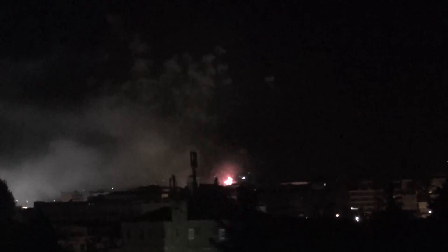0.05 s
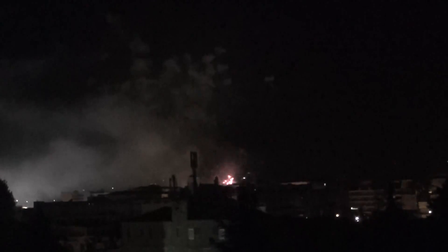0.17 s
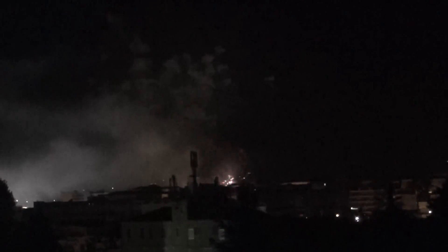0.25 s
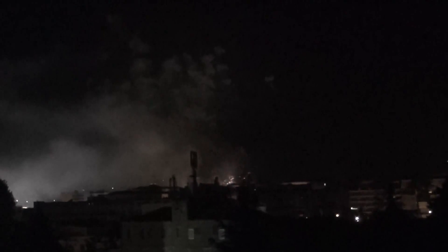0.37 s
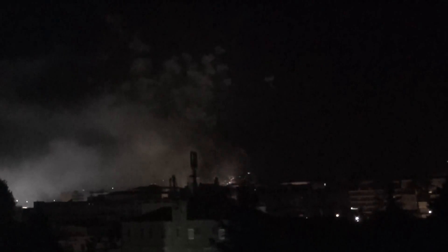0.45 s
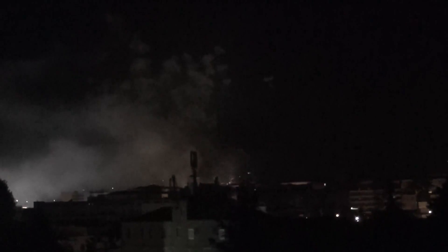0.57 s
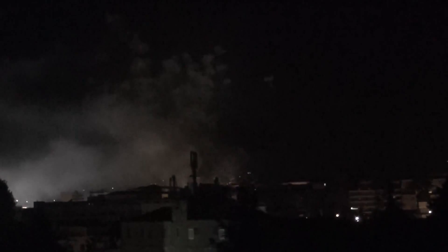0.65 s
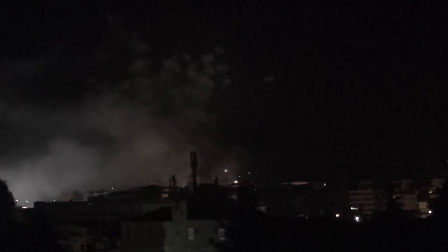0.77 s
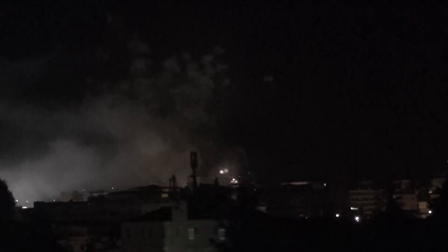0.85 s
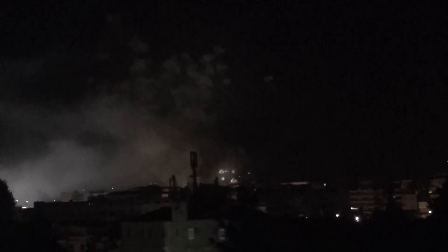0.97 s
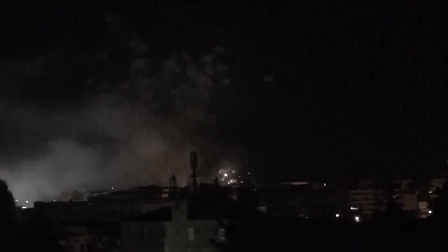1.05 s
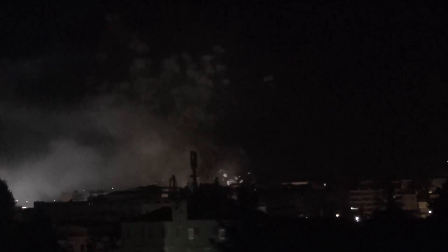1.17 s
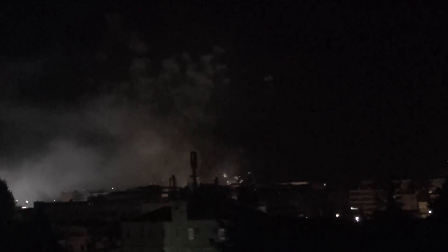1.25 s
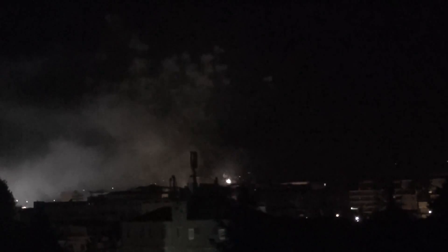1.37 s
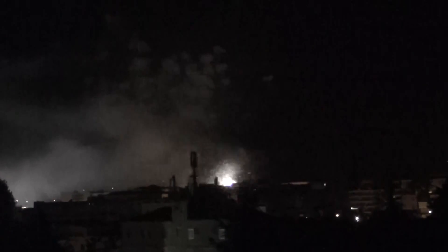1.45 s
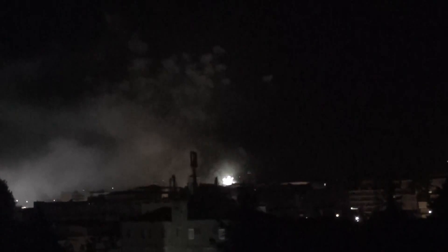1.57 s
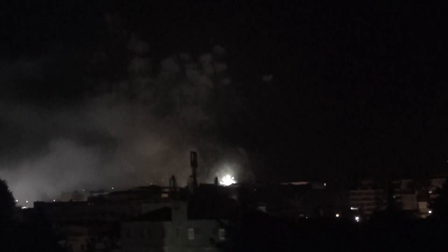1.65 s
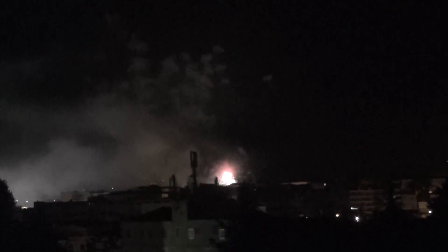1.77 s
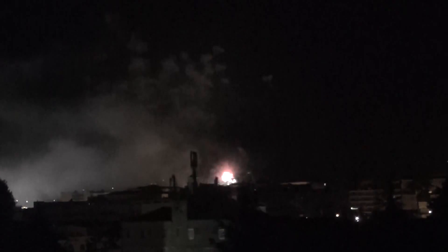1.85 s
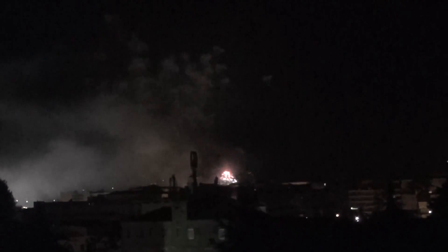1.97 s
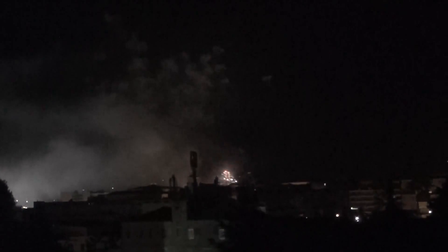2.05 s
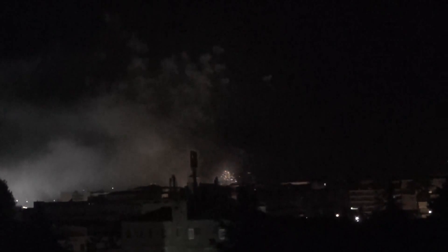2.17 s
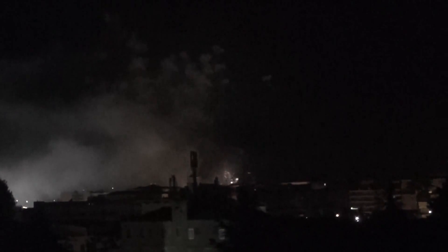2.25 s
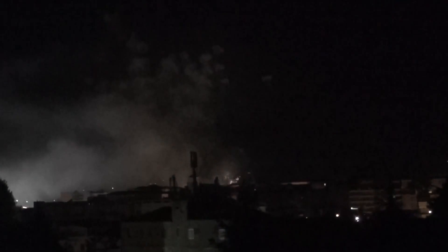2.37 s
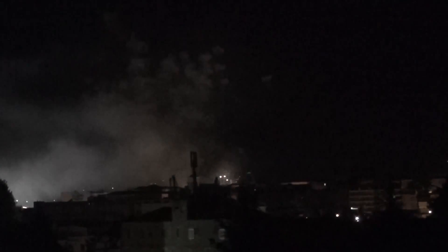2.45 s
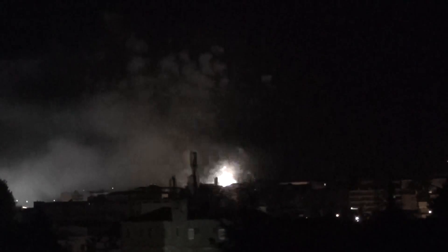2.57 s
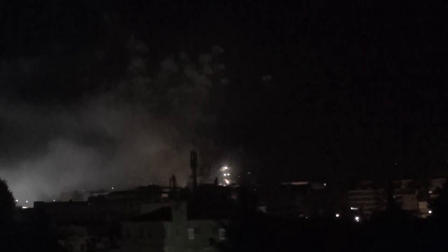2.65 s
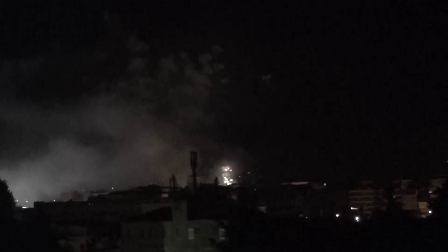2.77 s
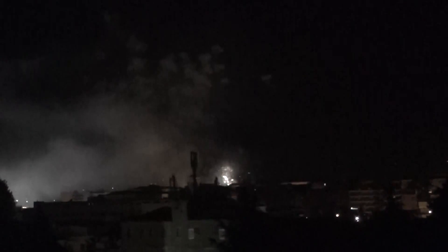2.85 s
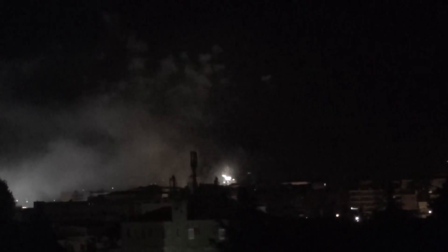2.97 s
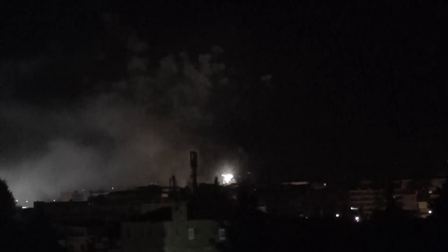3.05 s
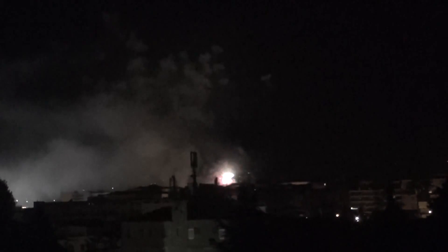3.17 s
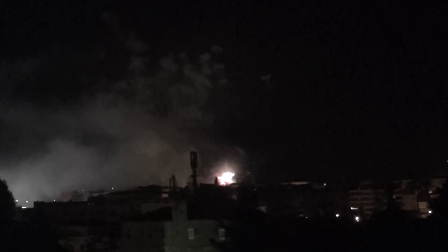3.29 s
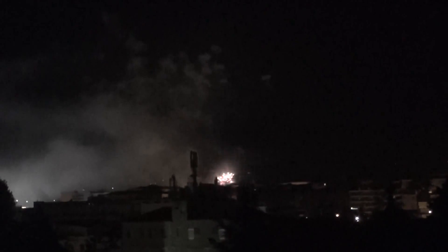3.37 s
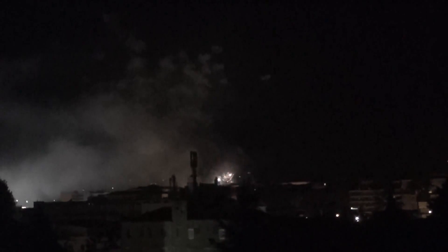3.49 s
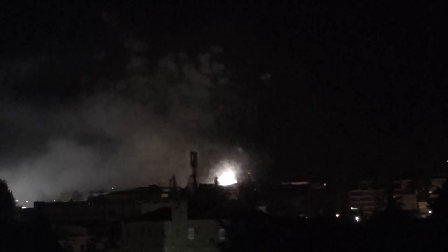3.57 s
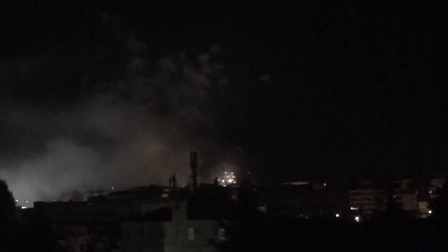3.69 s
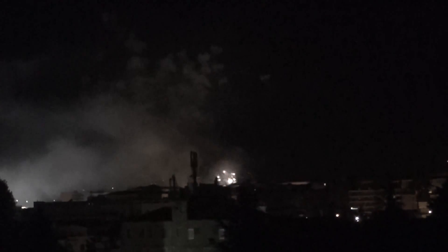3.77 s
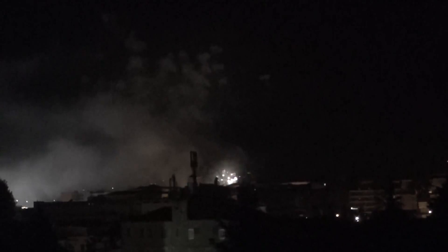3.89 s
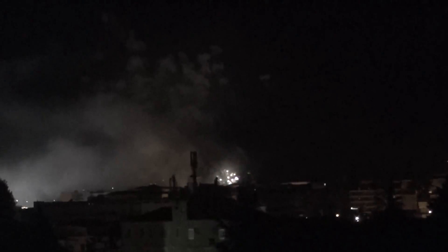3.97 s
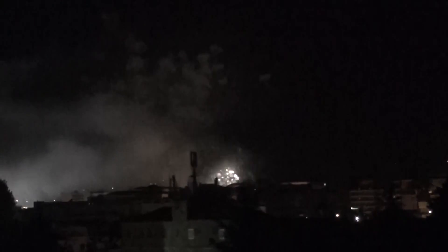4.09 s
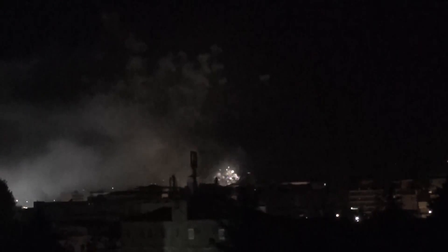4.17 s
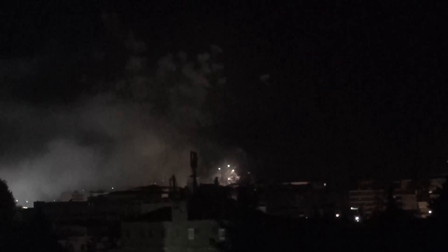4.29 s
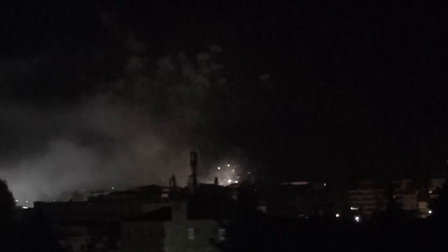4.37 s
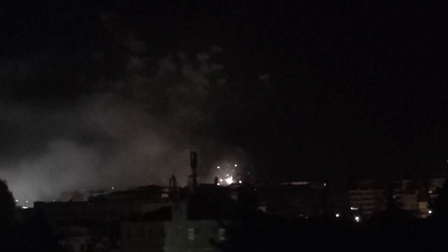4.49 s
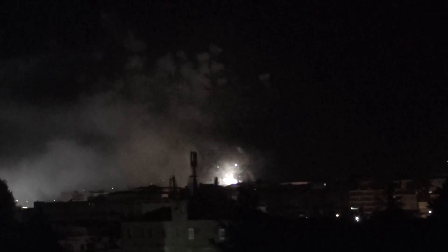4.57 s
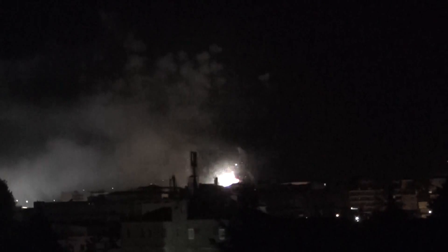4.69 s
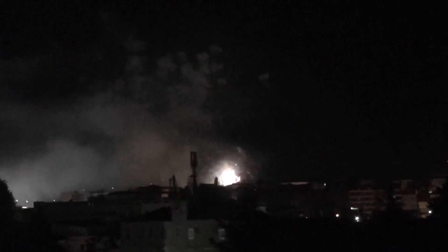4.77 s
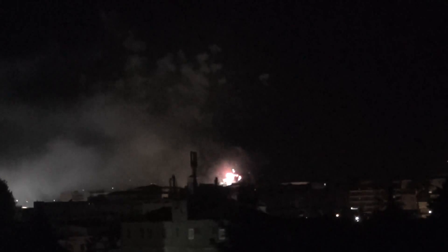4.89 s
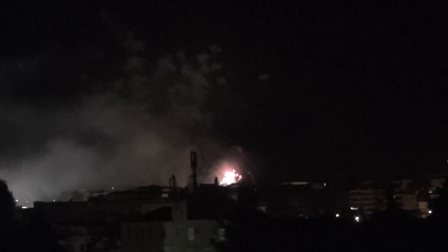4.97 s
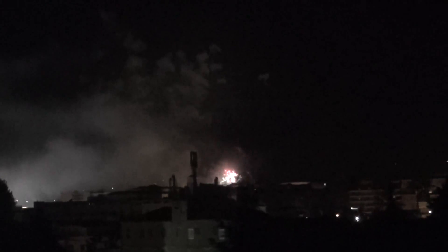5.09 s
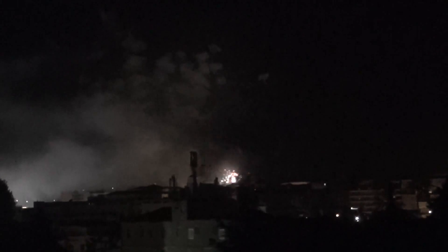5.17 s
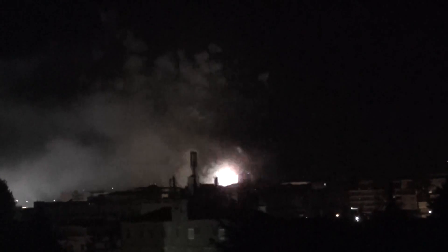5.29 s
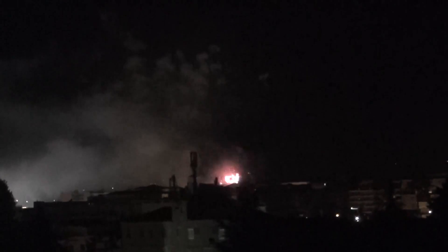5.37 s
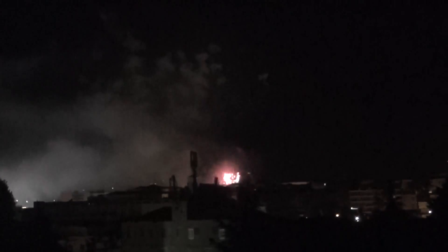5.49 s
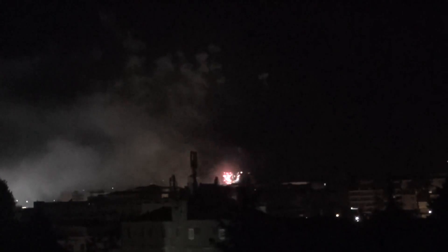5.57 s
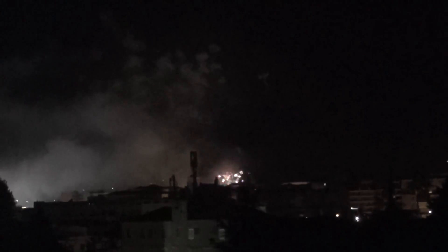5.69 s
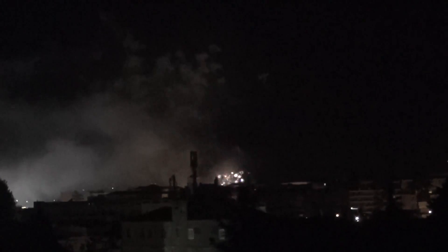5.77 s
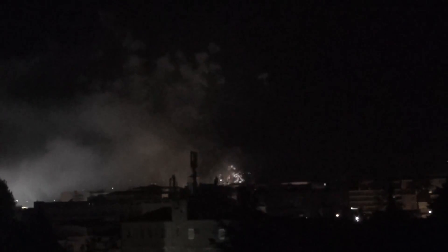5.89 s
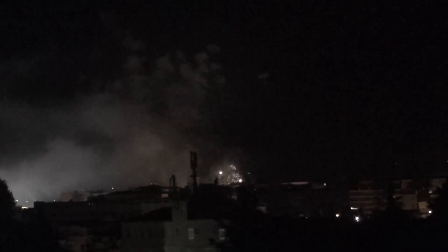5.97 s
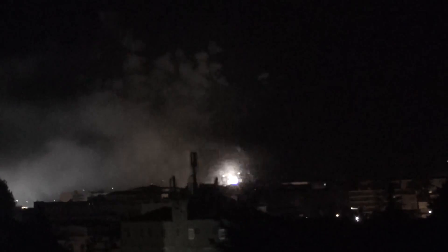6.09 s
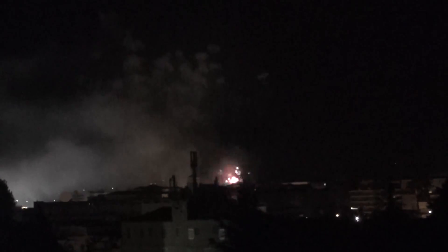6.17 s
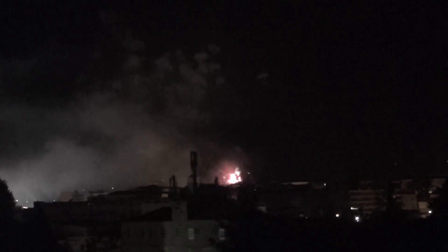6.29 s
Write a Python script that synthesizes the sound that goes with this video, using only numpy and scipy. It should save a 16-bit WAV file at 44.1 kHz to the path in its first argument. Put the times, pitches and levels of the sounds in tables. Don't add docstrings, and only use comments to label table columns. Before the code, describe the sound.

A small stereo camera on a balcony hears distant fireworks over a town at night. A dull blast is already sounding at 0 s, its lumpy echo rolling off house fronts and fading over about a second, while very faint high brushes of a hand on the case occur before 0.6 s. After a lull, thumps cluster at 1.34, 1.5 and 1.7 s, with brighter airborne snaps close behind until 1.8 s. More booms come at 2.6, 2.9 and 3.1 s, then a separate one at 3.6 s. From 4.4 to 5.5 s they crowd together, thumps and crisp snaps overlapping in continuous rumble. The roll thins before a last blast at 6.1 s and snap at 6.25 s, cut off while echoing. Throughout lie soft town murmur, a weak fluttering low generator hum, hiss and a thin steady electronic whine.

```python
import sys
import numpy as np
from scipy import signal
from scipy.fft import rfft, irfft, next_fast_len
from scipy.io import wavfile
from scipy.ndimage import uniform_filter1d

SR = 44100
rng = np.random.default_rng(int(sys.argv[2]) if len(sys.argv) > 2 else 0)


def boost(x):
    u = np.asarray(x, float) / 20
    return 10 ** u


def put_to_file(sound):
    columns = np.atleast_2d(sound).T
    safe = np.clip(columns, -1, 1)
    whole_steps = np.round(safe * 32767)
    wavfile.write(sys.argv[1], SR, whole_steps.astype(np.int16))


N = 279594


def colour(x, table):
    size = next_fast_len(x.shape[-1] + 4096)
    table_hz, table_db = np.transpose(table)
    bin_hz = np.fft.rfftfreq(4096, 1 / SR)
    level_db = np.interp(np.log(bin_hz + 1), np.log(table_hz), table_db)
    cepstrum = irfft(level_db * np.log(10) / 20)
    cepstrum[1:2048] *= 2
    cepstrum[2049:] = 0
    response = irfft(np.exp(rfft(cepstrum)))
    return irfft(rfft(x, size) * rfft(response, size), size)[..., :x.shape[-1]]


# pitch_hz [Hz], side_level_db [dB]
SIDE_COLOUR = [(30, -21), (60, -10), (125, -29), (400, -25), (1000, -12), (2500, -8), (6000, -9.5),
               (10000, -12.5), (11500, -20)]


def widen(side):
    return colour(side, SIDE_COLOUR)


# pitch_hz [Hz], level_db [dB per Hz]
TOWN_COLOUR = [(15, -39), (30, -16), (60, -21), (90, -9), (130, -11.5), (200, -5.5), (400, -11),
               (800, -11.5), (1300, -16.5), (2000, -25.5), (3450, -33), (4400, -35.5), (9000, -41.5),
               (15500, -42)]


def night():
    warm_up = 4096
    mid, side = (colour(rng.standard_normal(N + warm_up), TOWN_COLOUR)[warm_up:] for _ in range(2))
    gain = boost(-51) / mid.std()
    return gain * mid, gain * boost(2.5) * widen(side)


# start_s [s], length_s [s], pitch_hz [Hz], level_db [dB]
GENERATOR_TONES = [(0, 5.6, 123.4, -65), (.8, 1.0, 123.4, -61), (2.95, .9, 123.4, -58),
                   (4.0, .6, 123.4, -63), (.8, 1.1, 49.1, -75), (1.9, .7, 49.1, -66), (3.0, 3.3, 49.1, -73),
                   (0, .55, 77, -64), (1.3, .5, 77, -70), (4.7, 1.6, 77, -70), (0, .3, 103, -65),
                   (2.15, .55, 103, -62), (3.1, .6, 103, -68), (4.7, 1.6, 103, -67)]


def generator(t):
    start_s, length_s, pitch_hz, level_db = np.transpose(GENERATOR_TONES)[:, :, None]
    slow = rng.standard_normal((2, 4, N))
    for _ in range(2):
        slow = uniform_filter1d(slow, 2500)
    pitch_group = np.searchsorted([60, 90, 110], pitch_hz[:, 0])
    level_drift, phase_drift = (slow / slow.std())[:, pitch_group]
    fade_s = 0.12
    to_edge_s = np.minimum(t - start_s, start_s + length_s - t)
    swell = np.clip(to_edge_s / fade_s + 0.5, 0, 1)
    phase = 2 * np.pi * np.round(pitch_hz, 1) * t + 0.6 * phase_drift
    tones = swell * boost(level_db + 1.3 * level_drift) * np.sin(phase)
    return np.sqrt(2) * np.sum(tones, axis=0)


# multiple [of the clock], level_db [dB]
STRONG_WHINE = [(10, -76), (20, -67.5), (30, -72), (40, -77), (50, -76.5), (60, -91)]
# pitch_hz [Hz], level_db [dB]
WEAK_WHINE = [(1400, -92), (2200, -81), (3600, -87.5), (5400, -99), (9000, -97), (13500, -99)]


def whine(t):
    clock_hz = 200
    multiple = np.arange(7, 68)
    level_db = np.interp(multiple * clock_hz, *np.transpose(WEAK_WHINE))
    level_db = level_db + 2.1 * rng.standard_normal(len(multiple))
    for strong, strong_db in STRONG_WHINE:
        level_db[multiple == round(strong)] = strong_db
    phase = rng.uniform(0, 2 * np.pi, len(multiple))
    cycle = t[:SR // 100]
    tones = np.sin(2 * np.pi * clock_hz * multiple[:, None] * cycle + phase[:, None])
    return np.resize(np.sqrt(2) * boost(level_db) @ tones, N)


def play(events, columns, response):
    lead = SR // 2
    train = np.zeros(N + lead)
    for event in events:
        train[lead + int(event[0] * SR)] = boost(sum(event[k] for k in columns))
    return signal.fftconvolve(train, response)[lead:lead + N]


# pitch_hz [Hz], level_db [dB per Hz]
THUMP_COLOUR = [(24, -65.5), (60, -31.5), (100, -22), (135, -8.5), (180, -5.5), (280, 1.5), (400, -0.5),
                (560, -2), (720, -9.5), (900, -15.5), (1150, -22), (1450, -22), (2200, -30), (3600, -42),
                (5000, -53.5), (6500, -72), (11000, -120)]


def thump(x):
    unit = colour(np.eye(1, 4096)[0], THUMP_COLOUR)
    return colour(x, THUMP_COLOUR) / np.abs(unit).max()


def density(t):
    def power(level_db, hold_s, t60_s):
        return boost(level_db - 60 * np.maximum(t - hold_s, 0) / t60_s) ** 2

    close = power(-24, 0, 0.33)
    quarter = power(-28, 0.14, 1.3)
    far = power(-32.5, 0, 5.64)
    return np.sqrt(close + quarter + far)


def scatter(t, lumpy_db):
    lumps = rng.exponential(size=len(t) // 40 + 1).repeat(40)[:len(t)]
    clicks = rng.standard_normal(len(t)) * boost(lumpy_db * lumps)
    return clicks / clicks.std() * density(t)


# pitch_hz [Hz], level_db [dB]
MIRROR_COLOUR = [(850, 0), (1200, -12), (2000, -27.5)]


def mirrored(x):
    return colour(x, MIRROR_COLOUR)


# pitch_hz [Hz], level_db [dB]
SCATTER_COLOUR = [(500, -40), (800, -7), (1100, -1.5)]
# pitch_hz [Hz], level_db [dB]
YARD_COLOUR = [(200, 0.5), (222, -3), (250, 0), (350, -0.5), (405, 2), (440, 0)]


def roll(t, fronts, early_db, early_s):
    low = mirrored(0.75 * fronts + scatter(t, lumpy_db=0.3))
    wash = scatter(t, lumpy_db=0.96) * boost(2.0 + early_db * np.exp(-t / early_s))
    return thump(colour(low, YARD_COLOUR) + colour(wash, SCATTER_COLOUR))


# pitch_hz [Hz], level_db [dB]
AIR_COLOUR = [(40, -37), (120, -0.5), (2600, -8), (4000, -2), (5500, -32), (12000, -78)]


def rings(modes, t):
    rise = 1 - np.exp(-t / 0.00022)
    struck = 0
    for pitch_hz, level_db, t60_s in modes:
        struck = struck + boost(level_db) * np.sin(2 * np.pi * pitch_hz * t) * boost(-60 * t / t60_s)
    return colour(rise * struck, AIR_COLOUR)


# start_s [s], level_db [dB], crack_db [dB], treble_db [dB]
MORTAR_BLASTS = [(-.082, -2.5, 0, -7), (1.3426, -1.5, 0, 0.5), (1.4903, -3, 0, -12), (1.6759, -3.5, 3, -12),
                 (2.604, -0.5, 0.5, -3.5), (2.9141, -2, 0.5, 3), (3.0746, -3, 2.5, -7),
                 (3.6308, -0.6, 1, -3), (4.3872, -1.5, 0.5, -5), (4.5732, -4.5, -19, -17),
                 (4.734, -4, 0, -4), (4.836, -2.5, -2, -3), (5.1699, -1, -5, -10), (5.362, -0.3, 0.5, -3),
                 (6.108, -2, -3, -19)]


def blasts(columns, response):
    split = signal.butter(3, 1900, fs=SR, output="sos")
    low = signal.sosfiltfilt(split, response)
    treble = response - low
    return play(MORTAR_BLASTS, columns, low) + play(MORTAR_BLASTS, columns + [3], treble)


# delay_s [s], level_db [dB]
HOUSE_FRONTS = [(.004, -16), (.0071, -8), (.0114, -18), (.023, -5), (.0304, -0.5), (.0365, -1.5),
                (.045, -3), (.0626, -20), (.0787, -7), (0.082, -3.5), (0.087, 0), (0.1014, 2),
                (0.1087, -4.5), (0.1409, 2.5), (0.1765, 0), (.1889, -1), (0.2057, 1.5), (.343, -1),
                (0.387, -5.5), (0.434, -8), (.563, -8)]
# pitch_hz [Hz], level_db [dB], t60_s [s]
BALCONY_RINGS = [(187.3, -31.5, 0.24), (122.1, -46, 0.69), (323.7, -48, 0.024), (599.3, -54, 0.054),
                 (1243, -21, 0.016), (1453, -20.5, 0.015), (1650, -29, 0.058), (2234, -26.5, 0.017),
                 (2823, -60, 0.038), (3390, -46, 0.032)]


def mortars(t):
    fronts = np.zeros(len(t))
    for delay_s, level_db in HOUSE_FRONTS:
        fronts[int(delay_s * SR)] = -boost(level_db)
    echo = boost(-24.0) * roll(t, fronts, early_db=5.5, early_s=0.17)
    boom = rings(BALCONY_RINGS[:4], t)
    crack = rings(BALCONY_RINGS[4:], t)
    crack = crack + 0.23 * np.roll(crack, int(0.00361 * SR))
    cracks = blasts([1, 2], crack)
    arrival = np.eye(1, 4096, round(0.00027 * SR))[0]
    direct = -boost(3.5 - 25.5) * thump(mirrored(arrival))
    mid = blasts([1], echo - boom) + cracks + blasts([1, 2], direct)
    side = blasts([1], boost(-25.0) * roll(t, 0, early_db=9.0, early_s=0.12))
    return mid, widen(side) - 0.21 * cracks


# start_s [s], roll_db [dB], crack_db [dB]
SHELL_BREAKS = [(.03, -10.5, -28), (1.484, -7, -4), (1.7494, -15, -7), (1.8168, -9.5, -3), (2.745, -8, -23),
                (3.052, -5.5, -22), (3.21, -10.5, -12), (3.772, -9, -11), (4.53, -8, -11),
                (4.7117, -5.5, 0.5), (4.8714, -9, 3.5), (4.9744, -14.5, 2), (5.3083, -4, -3.5),
                (5.4994, -12, -5), (6.2467, -5.5, -0.5)]
# pitch_hz [Hz], level_db [dB], t60_s [s]
SNAP_RINGS = [(1010, -45, 0.007), (1700, -46, .015), (2500, -27.5, 0.0075), (3020, -36.5, 0.0047),
              (3800, -58, 0.013)]


def shells(t):
    snap = rings(SNAP_RINGS, t)
    first_echo = 1.1 * np.roll(snap, int(0.00428 * SR))
    second_echo = 0.46 * np.roll(snap, int(0.0091 * SR))
    snap = snap + first_echo + second_echo
    mid, side = (boost(-22.0) * roll(t, 0, early_db=9.5, early_s=0.0055) for _ in range(2))
    snaps = play(SHELL_BREAKS, [1, 2], boost(4.0) * snap)
    return play(SHELL_BREAKS, [1], mid) + snaps, widen(play(SHELL_BREAKS, [1], side))


# start_s [s] (middle of the brush), level_db [dB], length_s [s]
HAND_BRUSHES = [
    (.04, -74, .03),
    (.155, -72, .02),
    (0.323, -72, .08),
    (.57, -82, .02),
]


def rustle(t):
    shape = 0
    for middle_s, level_db, length_s in HAND_BRUSHES:
        shape = shape + boost(level_db) * np.exp(-(2 * (t - middle_s) / length_s) ** 2)
    return shape * colour(rng.standard_normal(N), [(8000, -20), (11000, 6), (13500, 0), (15000, -17)])


def scene():
    t = np.arange(N) / SR
    delay = t[:int(1.6 * SR)]
    mid, side = np.sum([night(), mortars(delay), shells(delay)], axis=0)
    tone = whine(t)
    mid = mid + generator(t) + rustle(t) + tone
    side = side - 0.16 * tone
    return np.array([mid + side, mid - side])


def band_limit(x):
    return signal.sosfilt(signal.butter(12, 15670, fs=SR, output="sos"), x)


def record(dry):
    top_cut = signal.ellip(8, 0.2, 70, 15550, fs=SR, output="sos")
    mix = signal.sosfilt(top_cut, dry)
    return band_limit(mix)


dry = scene()
out = record(dry)
put_to_file(out)
```